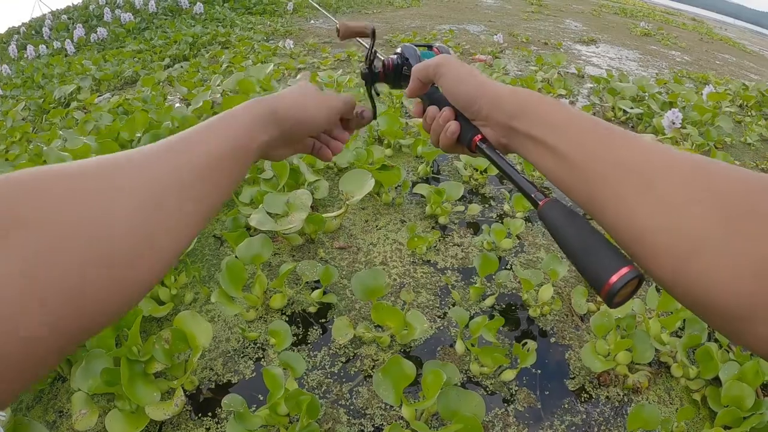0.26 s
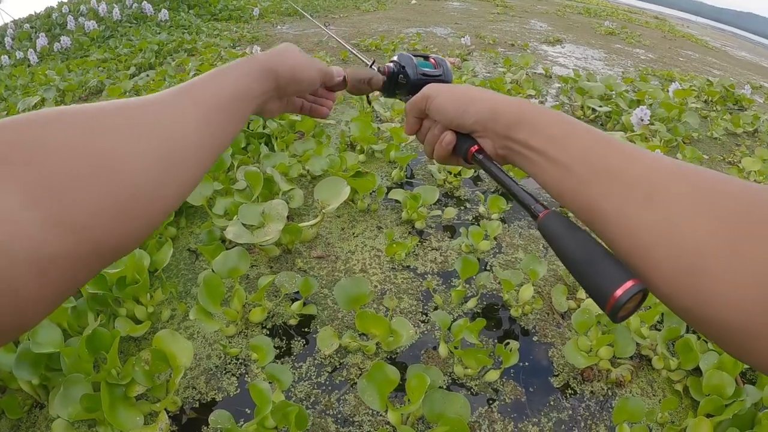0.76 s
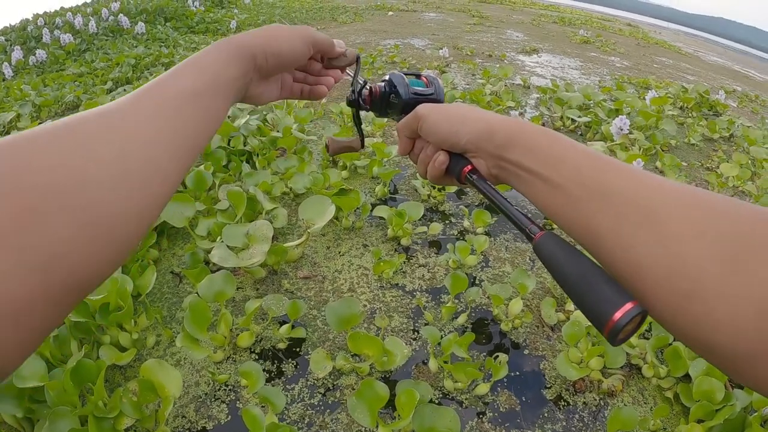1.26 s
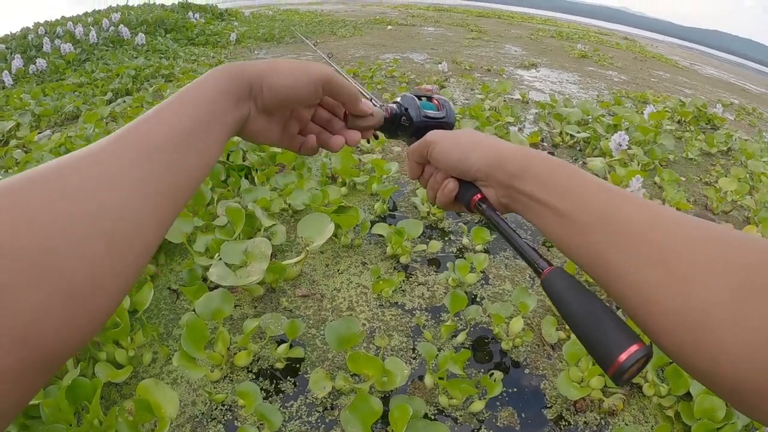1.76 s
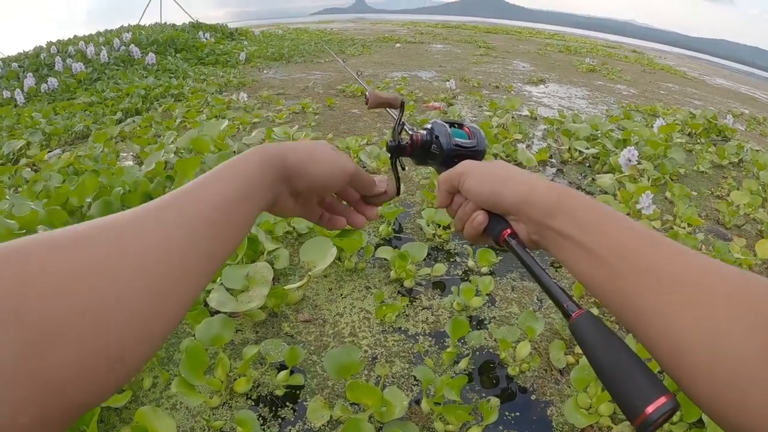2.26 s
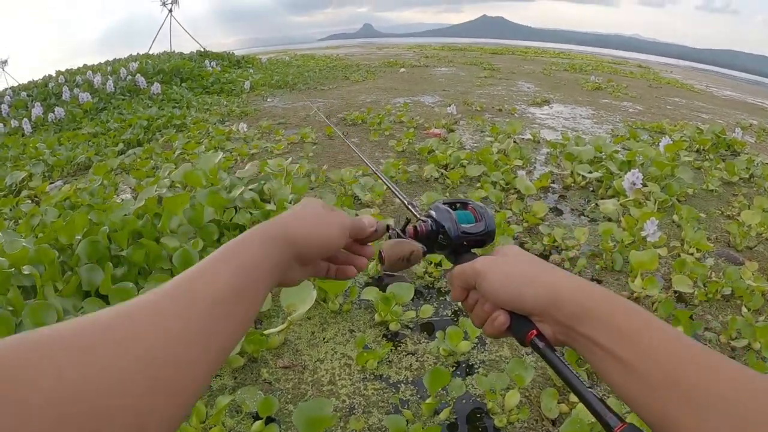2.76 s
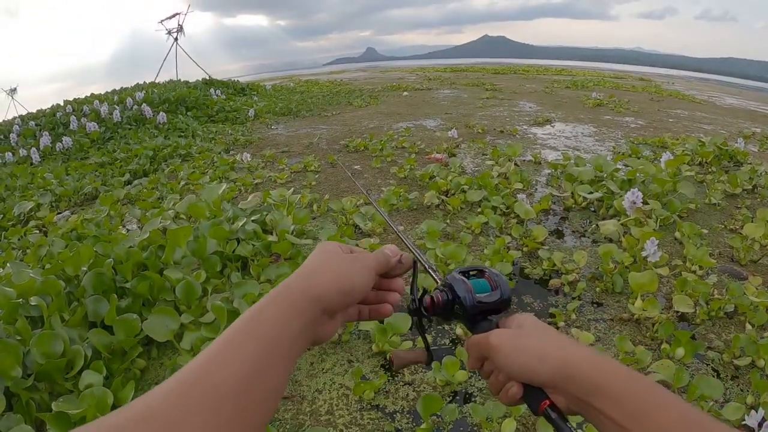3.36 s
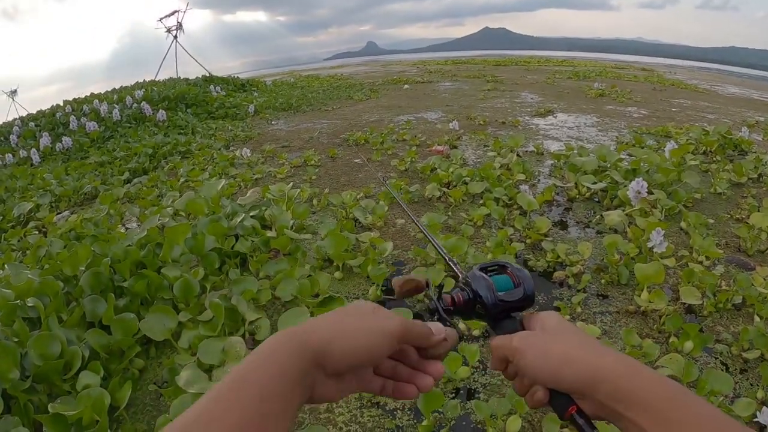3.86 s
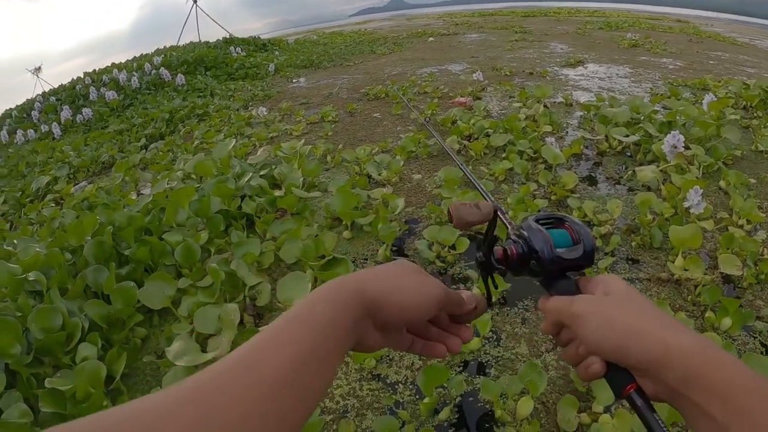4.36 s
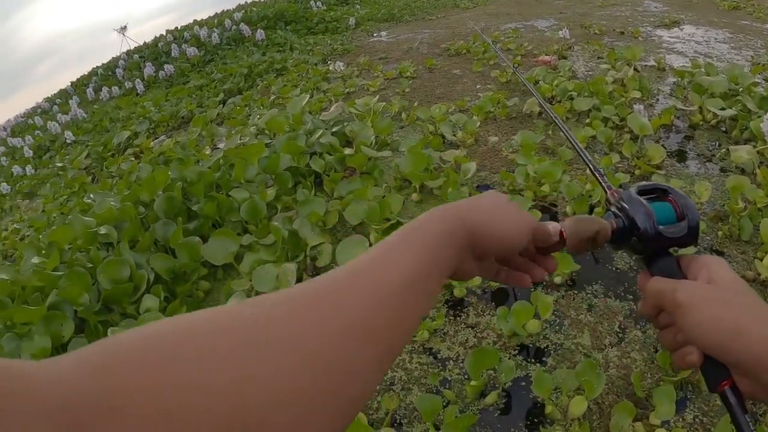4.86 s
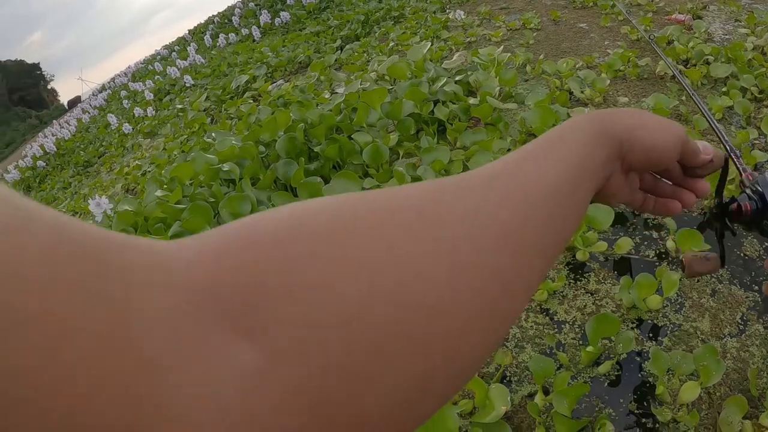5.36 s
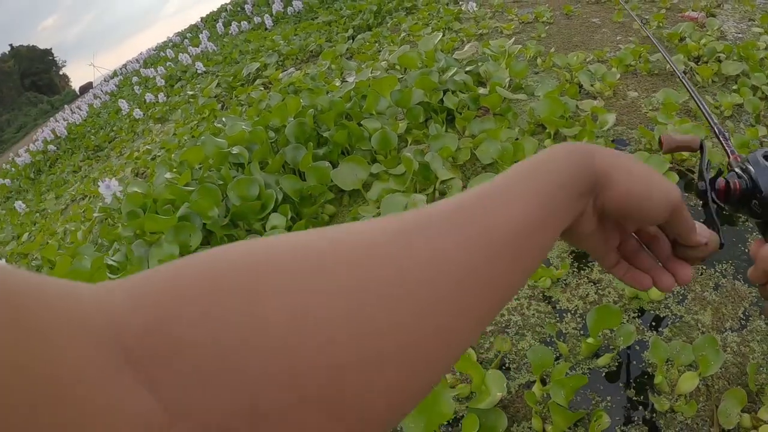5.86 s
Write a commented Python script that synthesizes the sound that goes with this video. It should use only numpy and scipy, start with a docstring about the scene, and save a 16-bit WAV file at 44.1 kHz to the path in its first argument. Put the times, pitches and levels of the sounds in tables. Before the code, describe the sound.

Hoarse bird chirps, high throbbing insects and a far boat engine, with wet leaves crackling and ticking as a fishing lure drags closer.

```python
"""An angler reels a lure in through floating leaves, which rustle, tick and plop as it comes near.
Stems scrape past it and water spits off the leaves. Around the weedy lake shore, birds chirp with
hoarse, rattling voices, another gives five thin falling notes, and insects rasp their wings in high
throbs. A far boat engine drones across the water over a low rumble of air."""
import sys
import numpy as np
from scipy import signal
from scipy.fft import rfft, irfft, next_fast_len
from scipy.io import wavfile

SR = 44100
rng = np.random.default_rng(int(sys.argv[2]) if len(sys.argv) > 2 else 0)


def file_out(sig):
    """Save sig as 16-bit WAV at sys.argv[1]."""
    # one column per channel
    cols = np.atleast_2d(sig).T
    # limit, then scale
    lim = np.clip(cols, -1, 1)
    pcm = np.round(lim * 32767).astype(np.int16)
    wavfile.write(sys.argv[1], SR, pcm)


N = 269936
TIME = np.arange(N) / SR

# The lure drags louder as it nears. Each row: time in seconds, level in dB (all levels are relative).
LURE_DRAG = [(0, -77), (2, -70.5), (2.6, -65.5), (3.02, -75), (3.2, -73.5), (3.5, -81), (4.28, -71),
             (4.45, -63.5), (5.65, -62), (5.89, -53), (5.95, -49), (6.12, -53.5)]
# It catches on a leaf and pulls free. Each row: middle in seconds, length in seconds, level in dB.
LURE_TUGS = [(1.013, 0.03, -62), (1.191, 0.064, -59), (1.599, 0.039, -60), (1.72, 0.12, -66.5),
             (2.245, 0.16, -62), (2.974, 0.37, -63), (4.365, 0.082, -57), (4.502, 0.15, -58.5),
             (4.585, 0.17, -56.5), (4.708, 0.089, -64), (4.793, 0.024, -59), (4.934, 0.092, -74),
             (4.984, 0.059, -58.5), (5.108, 0.14, -55.5), (5.247, 0.071, -56), (5.436, 0.26, -57),
             (5.532, 0.13, -52.5), (5.689, 0.024, -52), (5.746, 0.053, -57)]
# The tone of the leaves. Each row: frequency in Hz, level in dB.
LEAF_SPECTRUM = [(300, -23), (550, -11), (800, -12), (1200, -2.5), (2000, -2.5), (3200, -2.5), (5800, -11),
                 (7500, -7.5), (8600, -23), (11000, -31.5), (13000, -36.5), (15000, -54.5)]


def leaf_rustle(level_db=5, jerk_db=1.4, snaps_per_s=460, spread_db=2.5, clump_db=2.16, cycles=4):
    """Wet leaves slip and snap in clumps of tiny clicks, as strongly as the lure drags and tugs them."""
    crackle, t = np.zeros(N), TIME[:1500]
    for hz in np.geomspace(500, 15000, 24):
        at = rng.integers(0, N, int(snaps_per_s * N / SR))
        signs = rng.choice([-1, 1], len(at))
        snaps = np.zeros(N)
        snaps[at] = signs * gain_of(spread_db * np.minimum(rng.exponential(1, len(at)), 4))
        clumps = snaps * gain_of(clump_db * wander(22))
        click = np.sin(2 * np.pi * hz * t) * t * np.exp(-2 * hz * t / cycles)
        crackle += np.sqrt(hz) * unit_rms(signal.oaconvolve(clumps, click)[:N])
    pull = swells(along(LURE_DRAG), LURE_TUGS) * gain_of(jerk_db * wander(54))
    rustle = colour(crackle, LEAF_SPECTRUM) * pull
    return gain_of(level_db) * outdoors(rustle, wet_db=-14.5, fade_s=0.063, balance_db=2.0)


# Stems and tackle tick. Each row: start in seconds, level in dB, ring pitch in Hz,
# seconds for the crack to fade by 60 dB.
STEM_TICKS = [(0.723, -40.5, 3680, .008), (1.183, -42, 4500, .012), (1.356, -39, 1450, 0.014),
              (1.711, -43, 3830, 0.021), (1.73, -36, 6500, 0.02), (1.9453, -38.5, 5100, 0.013),
              (2.2142, -33, 3130, 0.026), (2.2686, -32, 2960, 0.0098), (2.504, -32, 2350, 0.06),
              (2.698, -35, 1900, 0.015), (3.9802, -35.5, 6800, 0.026), (4.32, -34.5, 2330, 0.016),
              (4.34, -31, 2500, 0.0076), (4.346, -32, 5100, 0.017), (4.3673, -31, 1990, 0.017),
              (4.37, -35, 1380, 0.019), (4.486, -35.5, 2870, 0.019), (4.532, -31, 3300, 0.005),
              (4.5354, -24, 2270, 0.012), (4.633, -35.5, 1180, 0.017), (4.657, -30, 3300, 0.013),
              (4.6808, -32, 2750, 0.018), (4.793, -32, 4120, .015), (4.8847, -39, 3050, 0.017),
              (4.944, -36.5, 3860, 0.033), (4.943, -51, 1910, .012), (4.984, -34.5, 3750, 0.011),
              (5.0296, -35.5, 1360, 0.0019), (5.0345, -33, 1220, 0.0086), (5.1186, -31, 2090, 0.033),
              (5.3461, -40, 2440, .02), (5.486, -30.5, 3470, .01), (5.503, -36, 3900, 0.012),
              (5.546, -31, 3330, 0.027), (5.6797, -44, 1670, 0.048), (5.71, -36, 4700, 0.013),
              (5.822, -30.5, 7040, 0.04), (5.831, -33, 3300, 0.014), (5.883, -28.5, 1840, .008),
              (5.926, -26.5, 3590, 0.032), (5.936, -23, 2920, 0.026), (6.031, -29, 6950, 0.013),
              (6.037, -28, 2590, 0.011), (6.062, -32, 2920, 0.0083), (6.109, -32, 1370, 0.025)]


def stem_ticks(level_db=-4, ring_gain=0.91, ring_share=0.67, dull_hz=3200, snap_gain=4.8, snap_s=.0065):
    """A dull crack with a short ring. Ticks shorter than snap_s are mostly one hard snap."""
    out, t = np.zeros(N), TIME[:4000]
    dull = signal.butter(1, dull_hz, fs=SR, output="sos")
    for s, db, hz, fade_s in STEM_TICKS:
        band = signal.butter(5, [min(.4 * hz, 1150), 6200], "band", fs=SR, output="sos")
        crack = signal.sosfilt(dull, rng.standard_normal(len(t))) * gain_of(-60 * t / fade_s)
        ring = np.sin(2 * np.pi * hz * t) * gain_of(-60 * t / (ring_share * fade_s))
        decay = np.pi * hz * t
        snap = snap_gain * np.exp(-(fade_s / snap_s) ** 2) * (1 - decay) * np.exp(-decay)
        add(out, s, gain_of(db) * signal.sosfilt(band, 1.12 * crack + ring_gain * ring + snap))
    return gain_of(level_db) * outdoors(out, wet_db=-16, fade_s=0.03, balance_db=2.5)


# Water plops. Each row: start in seconds, level in dB, starting pitch in Hz, seconds to fade by 60 dB.
WATER_PLOPS = [(0.756, -43, 1150, 0.013), (1.356, -43.5, 1380, 0.015), (5.031, -42, 1010, 0.0063),
               (5.118, -43, 1076, 0.075), (5.201, -47.5, 447, 0.079), (5.69, -50, 1680, 0.093),
               (5.967, -35.5, 816, 0.03), (6.01, -40, 917, 0.072), (6.0625, -25, 1242, 0.033)]


def water_plops(rise=2.0, attack_s=0.00078):
    """Small bubbles ring between the leaves, rising a little in pitch."""
    out, t = np.zeros(N), TIME[:6000]
    for s, db, hz, fade_s in WATER_PLOPS:
        loudness = gain_of(db - 60 * t / fade_s) * (1 - np.exp(-t / attack_s))
        add(out, s, loudness * np.sin(2 * np.pi * hz * t * (1 + rise * t)))
    return outdoors(out, wet_db=-6.5, fade_s=0.09, balance_db=3.0)


# Stems scrape past. Each row: start in seconds, length in seconds, pitch in Hz, level in dB.
STEM_SCRAPES = [(1.581, 0.045, 5160, -62), (1.715, 0.021, 5700, -61), (4.773, 0.053, 4140, -58),
                (5.092, 0.052, 1636, -54.5), (5.23, 0.026, 6340, -59), (5.495, 0.029, 3770, -50),
                (5.913, 0.045, 3270, -62)]


def stem_scrapes(width_hz=420, slip_db=3):
    """Quick, uneven slips make a stem ring roughly around one pitch."""
    out, slips = np.zeros(N), gain_of(slip_db * wander(150))
    rub = (wander(width_hz) + 1j * wander(width_hz)) * slips
    for s, length, hz, db in STEM_SCRAPES:
        t = TIME[:int(length * SR)]
        stroke = (rub[int(s * SR):][:len(t)] * np.exp(2j * np.pi * hz * t)).real
        add(out, s, gain_of(db) * unit_rms(stroke * signal.windows.tukey(len(t), .6)))
    return outdoors(out, wet_db=-14, fade_s=0.11, balance_db=2.5)


# Bursts of spray. Each row: middle in seconds, length in seconds, level in dB.
SPRAY_BURSTS = [(1.593, .04, -74), (1.727, .04, -80), (4.554, 0.083, -75), (4.63, 0.063, -70),
                (4.975, 0.079, -70), (5.128, 0.07, -68.5), (5.255, 0.067, -74), (5.54, 0.073, -73),
                (5.96, 0.44, -70.5)]
# The tone of the spray. Each row: frequency in Hz, level in dB.
SPRAY_SPECTRUM = [(4000, -33), (7000, -2.5), (9000, 1.5), (11500, -6), (13500, -10), (15500, -14.5)]


def water_spray(flicker_db=3):
    """Water spits from the leaves as the lure pulls through."""
    spray = stereo(*noise_pair(SPRAY_SPECTRUM), balance_db=-7)
    return spray * swells(-110, SPRAY_BURSTS) * gain_of(flicker_db * wander(200))


# Bird calls that step low, high, low. Each row describes the top note: start in seconds,
# length in seconds, pitch in Hz, level in dB, hoarseness from 0 to 1.
STEPPED_BIRD_CALLS = [(0.676, 0.026, 2850, -49.5, 0.29), (1.144, 0.047, 2840, -39.5, 0.24),
                      (1.533, 0.054, 2800, -44.5, 0.43)]
# Sliding chirps. Each row: start in seconds, length in seconds, start pitch in Hz, end pitch in Hz,
# bend in the middle in Hz, level in dB, hoarseness (capped at 1).
SLIDING_CHIRPS = [(0.119, 0.1, 2314, 1873, 561, -59, 0.4), (0.442, 0.14, 2500, 2150, 102, -69, 0.7),
                  (0.599, 0.052, 2290, 2370, 82, -64.5, 0.4), (0.642, 0.044, 2680, 3170, 178, -61.5, 0.26),
                  (0.809, 0.083, 2460, 2130, 92, -61, 0.72), (0.881, 0.094, 2054, 2110, 258, -53, 0.6),
                  (1.044, 0.07, 2430, 2310, 78, -61.5, 0.48), (1.226, 0.071, 2424, 2300, 106, -61, 0.69),
                  (1.268, 0.056, 1880, 1445, -2, -64, .76), (1.842, 0.054, 2520, 2250, 3, -66.5, 0.46),
                  (2.016, 0.092, 1648, 1554, 0, -70, 0.64), (2.087, 0.12, 2270, 2620, 233, -61, 0.7),
                  (2.202, 0.075, 2520, 2440, 1, -60.5, 0.33), (2.332, 0.06, 2925, 2370, 2, -58, 0.8),
                  (2.372, 0.07, 2570, 2500, 239, -54.5, 0.83), (2.532, 0.11, 2530, 2774, 55, -57, 0.59),
                  (2.607, 0.084, 2350, 2690, 0, -60, 1.1), (2.676, 0.1, 2197, 2660, 105, -58.5, 0.82),
                  (2.705, 0.056, 3150, 3320, 3, -62, 0.5), (2.779, 0.11, 2660, 2780, 42, -56, 0.53),
                  (2.884, 0.05, 2600, 2700, 1, -61, 0.6), (2.932, 0.07, 2495, 2850, 67, -55.5, 0.37),
                  (3.009, 0.064, 1850, 1510, 1, -67.5, 0.5), (3.234, 0.17, 2465, 2440, 150, -65, 0.55),
                  (3.421, 0.071, 1698, 1440, 4, -70, 0.65), (3.598, 0.071, 2540, 3120, -2, -66.5, 0.67),
                  (3.693, 0.11, 2340, 1830, -7, -69.5, 0.7), (3.954, 0.17, 2394, 2310, -63, -66.5, 0.6),
                  (4.143, 0.12, 2316, 2040, -130, -63.5, 0.4), (4.328, 0.12, 2250, 2250, -58, -60, 0.45),
                  (5.271, 0.14, 3280, 2550, -100, -64, 0.42)]


def hoarse_birds(level_db=3.5, rattle_hz=120, hoarse_extra_hz=230, rattle_depth=.38, warble=.115):
    """Birds call and chirp with voices that rattle in quick, uneven beats, shaking level and pitch."""
    out, shake, uneven = np.zeros(N), wander(170), 1 + .25 * wander(60)
    flutter = (wander(450) + 1j * wander(450)) / np.sqrt(2)

    def voice(s, hz, hoarse):
        """A whistle: the hoarser it is, the faster and wider it warbles and the more it flutters."""
        span, hoarse = slice(int(s * SR), int(s * SR) + len(hz)), np.clip(hoarse, 0, 1)
        beat_hz = (rattle_hz + hoarse_extra_hz * hoarse) * uneven[span]
        beat = np.cos(2 * np.pi * np.cumsum(beat_hz) / SR)
        pitch = hz * (1 + hoarse * (.04 * shake[span] - warble * beat))
        whistle = np.exp(2j * np.pi * np.cumsum(pitch) / SR)
        roughness = 1 - .7 * hoarse * (1 - flutter[span])
        return unit_rms((whistle * (1 + rattle_depth * beat) * roughness).real)

    def low_note(s, length, hz, db, fall_hz_per_s=6900):
        """A soft, hoarse note that falls through the given pitch."""
        t = TIME[:int(length * SR)]
        note = voice(s, hz - fall_hz_per_s * (t - length / 2), hoarse=.45)
        add(out, s, gain_of(db) * note * signal.windows.tukey(len(t), .6))

    lead_in_s, overlap_s, sag_hz = 0.016, 0.0071, 150
    for s, length, top_hz, db, hoarse in STEPPED_BIRD_CALLS:
        progress = np.linspace(0, 1, int(length * SR))
        effort = (gain_of(-6) + np.sin(np.pi * progress) ** 4) * signal.windows.tukey(len(progress), .2)
        add(out, s, gain_of(db) * voice(s, top_hz - sag_hz * progress, hoarse) * effort)
        low_note(s - lead_in_s, length=lead_in_s, hz=top_hz * 0.75, db=db - 15)
        low_note(s + length - overlap_s, length=0.043, hz=top_hz * .74, db=db - 11.5)
    for s, length, start_hz, end_hz, bend_hz, db, hoarse in SLIDING_CHIRPS:
        progress = np.linspace(0, 1, int(length * SR))
        hz = start_hz + (end_hz - start_hz) * progress + bend_hz * np.sin(np.pi * progress) ** 2
        add(out, s, gain_of(db) * unit_rms(voice(s, hz, hoarse) * signal.windows.tukey(len(hz), 0.45)))
    # Quick bounces off the water, then a faint tail from the bank.
    out += gain_of(-10) * echoes(out, fade_s=.035)
    return gain_of(level_db) * outdoors(out, wet_db=-21, fade_s=.45, balance_db=3.5)


# Another bird's thin notes. Each row: start in seconds, length in seconds,
# pitch in Hz at the start and at the end of the slide, level in dB.
THIN_NOTES = [(3.43, 0.13, 8280, 8330, -72.5), (3.675, 0.16, 8400, 7860, -60.5),
              (3.887, 0.115, 8410, 7770, -60), (4.079, 0.14, 8390, 7750, -60),
              (4.327, 0.15, 8100, 7770, -57.5)]


def thin_bird(wet_db=-6, fade_s=0.78, flick_hz=800, flick_s=0.0056):
    """Very high, raspy whistles flick down, slide on and swell in the middle, blurred by the reeds."""
    out, shake, flutter = np.zeros(N), wander(350), wander(450)
    for s, length, start_hz, end_hz, db in THIN_NOTES:
        t = TIME[:int(length * SR)]
        span = slice(int(s * SR), int(s * SR) + len(t))
        slide = start_hz + (end_hz - start_hz) * t / length
        hz = (slide + flick_hz * np.exp(-t / flick_s)) * (1 + .006 * shake[span])
        whistle = np.sin(2 * np.pi * np.cumsum(hz) / SR) * (1 + .45 * flutter[span])
        add(out, s, gain_of(db) * unit_rms(whistle * np.sin(np.pi * t / length)))
    blur = np.array([echoes(out, fade_s), echoes(out, fade_s)])
    return (out + gain_of(wet_db) * blur) * pan(-7.0)


# The insects. Each row: pitch in Hz, width of the band in Hz, throbs per second,
# time of one throb in seconds, throb depth in dB, left minus right in dB.
INSECT_VOICES = [(6930, 270, 7.25, .485, 4.8, 8), (7220, 220, 6.1, .1, 1, 12),
                 (7600, 300, 7.17, 2.045, 5, 8), (7880, 380, 7.17, 2.045, 3, -1),
                 (3960, 170, 5.3, 0, .5, 0)]
# Each of them holds a level and swells once. Each row: steady level in dB,
# then the swell's middle in seconds, length in seconds and level in dB.
INSECT_SWELLS = [(-66, 3.4, 2.6, -66), (-68, 3.24, 0.56, -59), (-69, 3.95, 7.1, -65.5),
                 (-79, 1.2, 2.4, -70.5), (-86.5, 0.49, 2.3, -74)]


def insects(early_depth=.5, full_depth_s=3.2):
    """Rasping wings ring in a narrow band, in throbs that deepen over the first few seconds."""
    out, deepening = np.zeros((2, N)), np.interp(TIME, [0, full_depth_s], [early_depth, 1])
    for voice, (steady_db, *swell) in zip(INSECT_VOICES, INSECT_SWELLS):
        hz, width_hz, rate, peak_s, depth_db, balance_db = voice
        narrow = signal.butter(2, width_hz / 2, fs=SR, output="sos")
        wings = signal.sosfilt(narrow, rng.standard_normal((2, N)) + 1j * rng.standard_normal((2, N)))
        rasp = unit_rms((wings * np.exp(2j * np.pi * hz * TIME)).real)
        throb_db = depth_db * deepening * np.cos(2 * np.pi * rate * (TIME - peak_s)) + 1.7 * wander(26)
        out += rasp * swells(steady_db, [swell]) * gain_of(throb_db) * pan(balance_db)
    return out


# The engine's speed. Each row: time in seconds, firings per second.
FIRING_RATE = [(0, 28.62), (.6, 28.62), (1.4, 28.75), (2.2, 28.68), (3, 28.86), (3.8, 28.84), (4.6, 28.71),
               (6.12, 28.6)]
# Its loudness. Each row: time in seconds, level in dB.
ENGINE_LOUDNESS = [(0, -48.5), (.7, -45.5), (2.2, -49), (3.2, -48), (5.1, -48.5), (6.12, -55.5)]
# The tones in its drone. Each row: multiple of the firing rate, level in dB.
ENGINE_TONES = [(1, -33), (2, -8), (3, -14.5), (4, -5), (5, -1), (6, 3), (7, -4.5), (8, -12), (9, -22.5),
                (10, -10.5), (11, -17.5), (12, -9.5), (13, -14.5), (14, -16.5), (15, -20.5), (16, -17),
                (17, -22), (18, -22), (19, -28), (20, -24.5)]


def boat_engine(level_db=-1, waver_db=2, puff_db=-9):
    """One exhaust thud and puff per firing; each tone fades in and out on its way over the water."""
    firings = np.cumsum(along(FIRING_RATE)) / SR
    thuds = np.zeros(N)
    for multiple, db in ENGINE_TONES:
        strength = gain_of(db + waver_db * wander(2.14))
        thuds += strength * np.cos(2 * np.pi * multiple * firings + rng.standard_normal())
    puff_spectrum = [(60, 9.5), (150, 1.5), (330, 2.5), (500, -10.0), (900, -27.5), (4000, -100)]
    puffs = colour(rng.standard_normal(N) * np.cos(np.pi * firings) ** 4, puff_spectrum)
    return (unit_rms(thuds) + gain_of(puff_db) * puffs) * gain_of(along(ENGINE_LOUDNESS) + level_db)


# The tones of the air's rumble, the wind and the shore's hiss. Each row: frequency in Hz, level in dB.
RUMBLE_SPECTRUM = [(30, -36.5), (55, -9), (90, -3), (130, 0.5), (200, -3.5), (280, -12.5), (420, -19),
                   (600, -24), (900, -35), (2000, -58.5), (6000, -100)]
WIND_SPECTRUM = [(10, -30), (28, -6), (42, -0.5), (60, 18.5), (75, 5.5), (110, 8.5), (250, -56.5),
                 (1500, -110)]
HISS_SPECTRUM = [(200, -37), (800, -4), (1500, 2), (2400, 5.5), (3300, 0.5), (3950, 2), (4400, -4.5),
                 (6200, -8.5), (8000, -23.5), (8800, -24), (11500, -58.5), (12500, -61.5), (16000, -82)]
# Soft gusts. Each row: middle in seconds, length in seconds, level in dB.
WIND_GUSTS = [(0.072, 0.35, -49.5), (0.795, 0.21, -58), (1.45, 0.29, -43), (1.88, 0.12, -46),
              (2.688, 0.42, -54), (2.996, 0.17, -38.5), (3.426, 0.83, -50.5), (4.937, 0.69, -74)]


def air(rumble_db=-51, lump_db=2.5, breeze_db=-60, buffet_db=4.5, hiss_db=-64):
    """Air rumbles, gusts buffet the microphone over a light breeze, and the far shore hisses."""
    rumble = stereo(*noise_pair(RUMBLE_SPECTRUM), balance_db=-0.5)
    rumble *= gain_of(rumble_db + lump_db * wander(4.4))
    shared, side = noise_pair(WIND_SPECTRUM)
    wind = np.array([shared + 0.071 * side, shared - 0.092 * side]) * pan(0.6)
    wind *= swells(breeze_db, WIND_GUSTS) * gain_of(buffet_db * wander(2.0))
    hiss = stereo(*noise_pair(HISS_SPECTRUM), balance_db=0.5)
    return rumble + wind + hiss * gain_of(hiss_db + 2.46 * wander(10.0))


# How alike left and right sound. Each row: frequency in Hz, likeness from 0 to 1.
STEREO_LIKENESS = [(50, 0.98), (200, 0.93), (600, 0.97), (2500, 0.84), (5000, 0.89), (8000, 0.25)]
# How far the left side runs ahead. Each row: frequency in Hz, lead in radians.
LEFT_LEAD = [(30, 1), (300, -0.73), (900, -0.94), (2400, -0.9), (5500, -1.1), (7000, -0.85)]


def stereo(left, unrelated, balance_db):
    """Two close microphones share the bass; an unrelated sound sets them apart in the treble."""
    count = next_fast_len(N)
    hz = np.fft.rfftfreq(count, 1 / SR)
    same = np.clip(at_frequency(STEREO_LIKENESS, hz), 0, 1)
    right = same * rfft(left, count) + np.sqrt(1 - same ** 2) * rfft(unrelated, count)
    right *= np.exp(-1j * at_frequency(LEFT_LEAD, hz))
    return np.array([left, irfft(right, count)[:N]]) * pan(balance_db)


def echoes(x, fade_s):
    """A wash of echoes off the plants and the bank, dying by 60 dB in fade_s."""
    t = TIME[:SR // 2]
    tail = rng.standard_normal(len(t)) * gain_of(-60 * t / fade_s) * (t > .003)
    return signal.fftconvolve(x, tail / np.linalg.norm(tail))[:N]


def outdoors(x, wet_db, fade_s, balance_db):
    """A sound plus its echoes at wet_db; the nearest leaves make left and right differ."""
    near = x + gain_of(wet_db) * echoes(x, fade_s)
    return stereo(near, echoes(near, fade_s=.025), balance_db)


def gain_of(db):
    """Turns decibels into a multiplier."""
    return 10 ** (np.asarray(db) / 20)


def unit_rms(x):
    """Scales a sound to an average strength (rms) of 1."""
    return x / np.sqrt(np.mean(x ** 2) + 1e-20)


def at_frequency(rows, hz):
    """Reads between rows on a log-frequency axis."""
    row_hz, value = np.transpose(rows)
    return np.interp(np.log(hz + 1), np.log(row_hz + 1), value)


def along(rows):
    """Reads a curve over time at every sample."""
    return np.interp(TIME, *np.transpose(rows))


def swells(base_db, rows):
    """The gain of a base level with smooth swells on top."""
    bumps = sum(gain_of(db) ** 2 * np.maximum(1 - (2 * (TIME - middle) / length) ** 2, 0) ** 2
                for middle, length, db in rows)
    return np.sqrt(gain_of(base_db) ** 2 + bumps)


def add(mix, s, sound):
    """Mixes a sound in, starting at s seconds."""
    part = mix[max(round(s * SR), 0):][:len(sound)]
    part += sound[:len(part)]


def wander(rate_hz):
    """A smooth random wobble of strength 1, mostly slower than rate_hz."""
    count = next_fast_len(N)
    smoothing = np.exp(-(np.fft.rfftfreq(count, 1 / SR) / rate_hz) ** 2)
    return unit_rms(irfft(rfft(rng.standard_normal(count)) * smoothing, count)[:N])


def colour(x, spectrum):
    """Shapes a sound's tone by rows of (Hz, dB) and scales it to strength 1."""
    count = next_fast_len(N)
    gains = gain_of(at_frequency(spectrum, np.fft.rfftfreq(count, 1 / SR)))
    return unit_rms(irfft(rfft(x, count) * gains, count)[..., :N])


def noise_pair(spectrum):
    """Two unrelated noises with the same tone."""
    return colour(rng.standard_normal((2, N)), spectrum)


def pan(balance_db):
    """Left and right gains; above zero leans left."""
    return gain_of([[balance_db / 2], [-balance_db / 2]])


def scene():
    """The shore, and the lure coming through its leaves."""
    shore = boat_engine() + air() + insects() + hoarse_birds() + thin_bird()
    return shore + leaf_rustle() + water_spray() + stem_scrapes() + stem_ticks() + water_plops()


def record(dry):
    """Cuts off the treble above 15200 Hz."""
    low_pass = signal.firwin(511, 15200, window=("kaiser", 9), fs=SR)
    return signal.oaconvolve(dry, low_pass[None], "same")


dry = scene()
out = record(dry)
file_out(out)
```